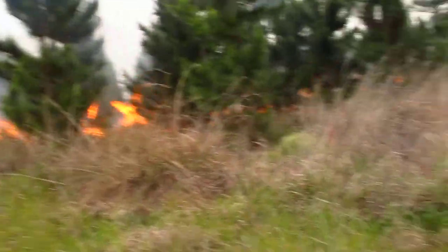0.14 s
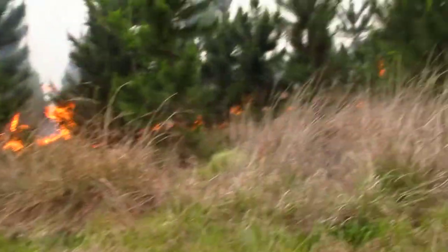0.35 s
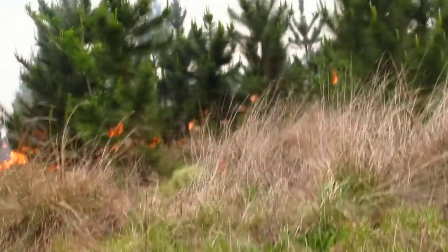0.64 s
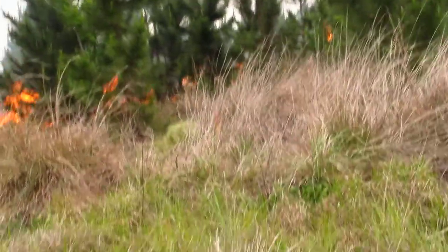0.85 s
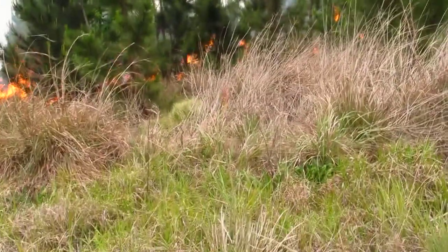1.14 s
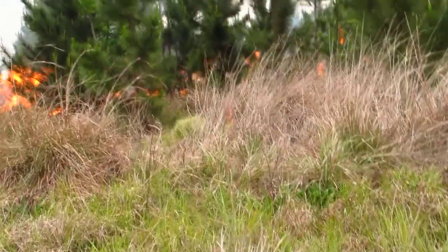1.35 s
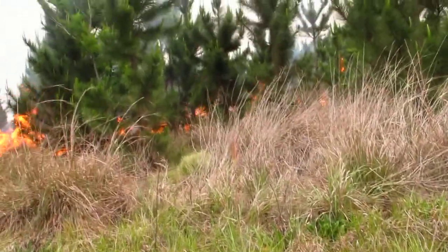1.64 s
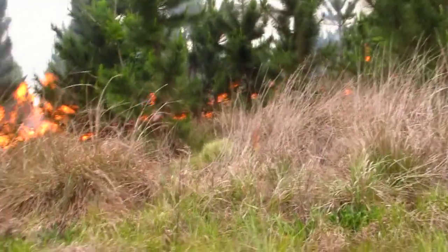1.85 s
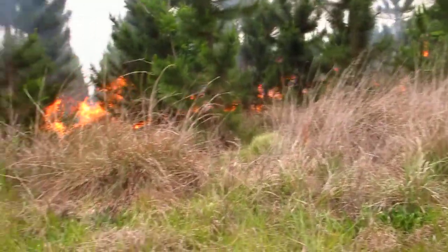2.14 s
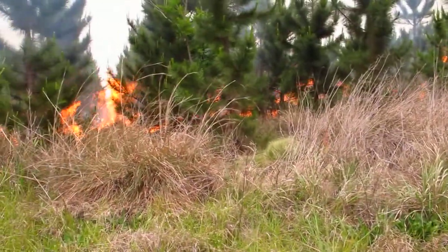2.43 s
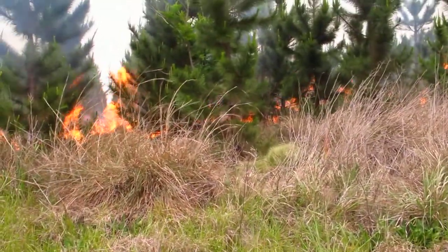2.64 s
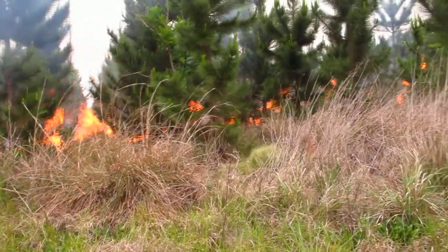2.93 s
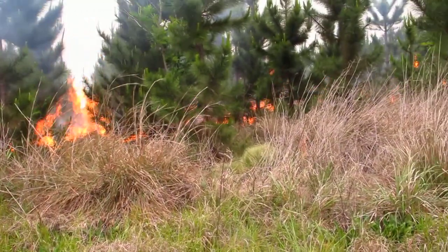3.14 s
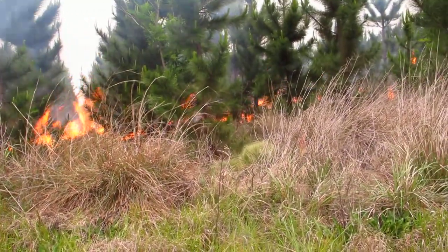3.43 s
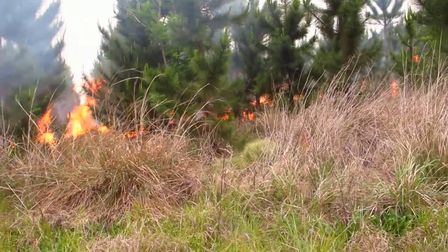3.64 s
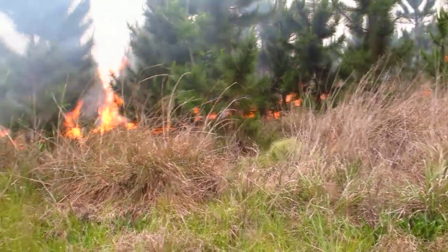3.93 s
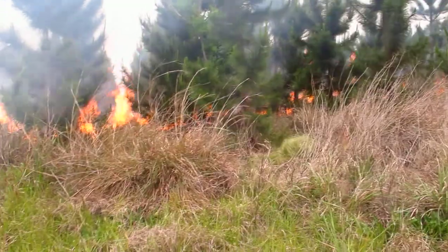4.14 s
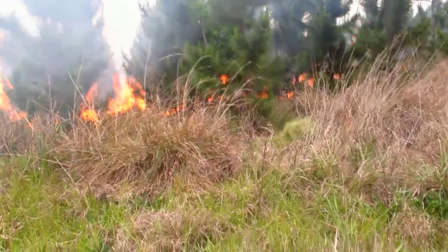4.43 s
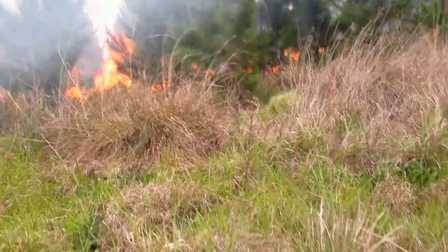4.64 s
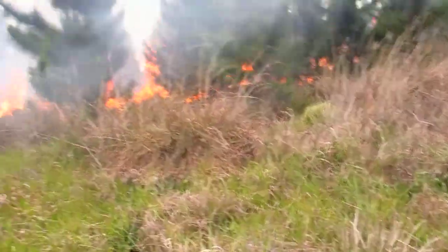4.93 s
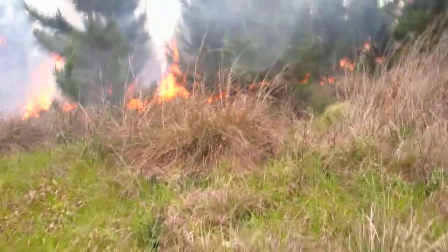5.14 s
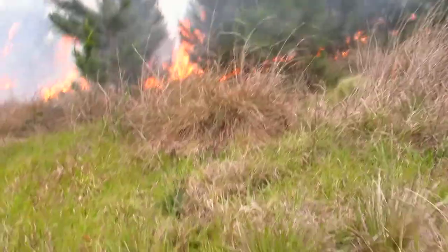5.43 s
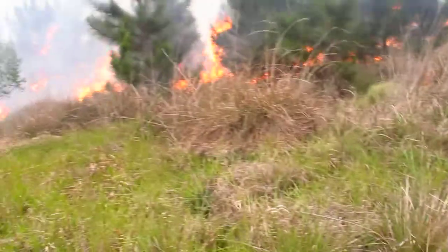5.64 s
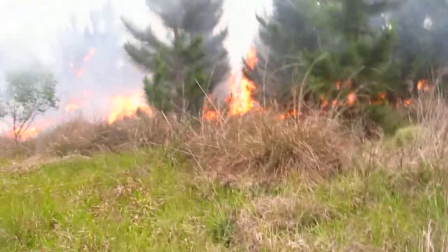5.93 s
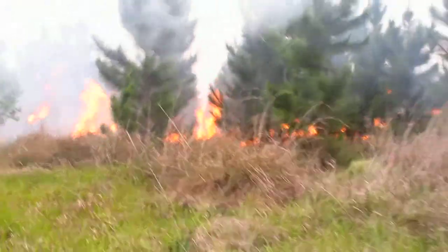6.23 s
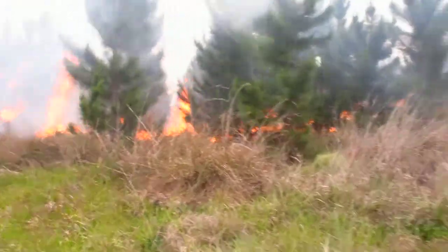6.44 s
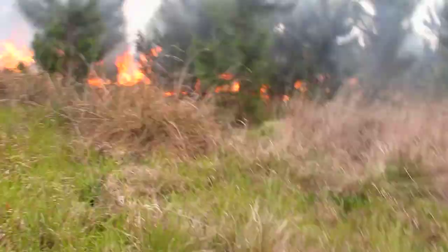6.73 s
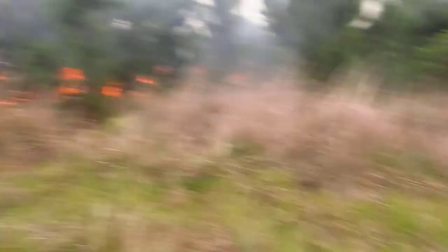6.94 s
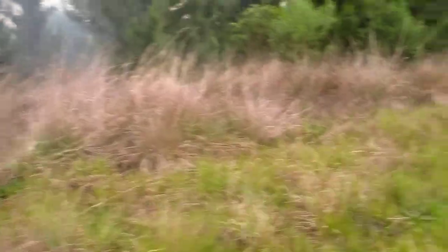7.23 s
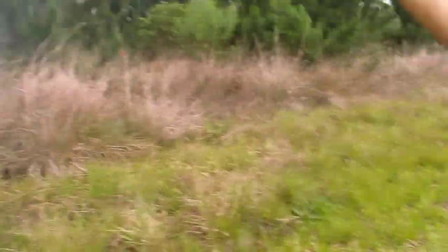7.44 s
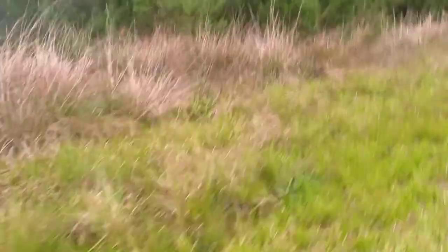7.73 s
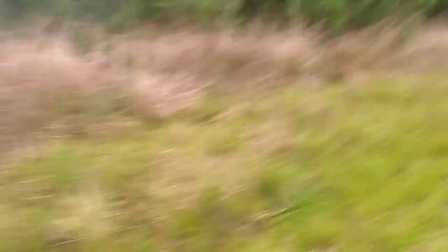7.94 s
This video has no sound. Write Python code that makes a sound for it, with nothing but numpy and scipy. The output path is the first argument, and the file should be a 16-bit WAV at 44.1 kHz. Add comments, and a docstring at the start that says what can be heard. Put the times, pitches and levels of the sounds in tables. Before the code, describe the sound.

Dry grass and young pine trees burn outdoors, some metres from a hand-held microphone. Dense crackling and a high hiss run throughout, swelling in brief flurries, while stems burst in sharp, irregular pops. The pops are loudest and thickest around the middle, then ease a little. The flames roar low underneath, wind buffets the microphone now and then, and grass rustles faintly near the start and end.

```python
"""Crackle, hiss and sharp pops: dry grass and young pines burn some metres from a hand-held camera.
Stems burst as pops that scatter through the grass; countless small ones merge into the crackle and hiss.
Under them the flames roar low, and a faint rustle comes and goes.
Wind buffets the two microphone ports, and each port rings at its own treble pitch;
gain control ducks the whole scene after the loudest pops."""
import sys
import numpy as np
from scipy import signal
from scipy.fft import rfft, irfft
from scipy.io import wavfile
from scipy.ndimage import uniform_filter1d, map_coordinates

SR = 44100
rng = np.random.default_rng(int(sys.argv[2]) if len(sys.argv) > 2 else 0)


def digitize_waveform(pressure):
    """Quantize a signal to 16-bit integers and store it at the path in sys.argv[1].

    Rows of a 2-D input are taken as channels; values are limited to [-1, 1].
    """
    field = np.atleast_2d(pressure).T
    bounded = np.clip(field, -1, 1)
    quanta = np.round(bounded * 32767).astype(np.int16)
    wavfile.write(sys.argv[1], SR, quanta)


N = 356416
BLOCK_SAMPLES = 256


def gain_of(db):
    """Decibels to an amplitude factor."""
    return 10 ** (np.asarray(db) / 20)


def unit_rms(x):
    """Scales to rms 1."""
    return x / np.sqrt(np.mean(x ** 2) + 1e-20)


def at_hz(table, hz):
    """Reads a spectrum table on a log-frequency axis."""
    table_hz, value = np.transpose(table)
    return np.interp(np.log(hz + 1), np.log(table_hz + 1), value)


def gain_curve(table, column):
    """One dB column of a time table as a gain per sample."""
    rows = np.array(table)
    return gain_of(np.interp(np.arange(N) / SR, rows[:, 0], rows[:, column]))


def add(mix, start_s, sound):
    """Mixes in a stereo sound."""
    part = mix[:, round(start_s * SR):][:, :sound.shape[1]]
    part += sound[:, :part.shape[1]]


def drift(span_s):
    """Smooth random curve of rms 1 that changes over span_s."""
    size = max(round(span_s * SR), 1)
    return unit_rms(uniform_filter1d(uniform_filter1d(rng.standard_normal(N), size), size))


# left-right coherence of wide sources: (frequency [Hz], coherence [0-1])
COHERENCE = [(60, 0.97), (150, 1), (380, 1), (950, 0.96), (2400, 0.89), (5000, 0.63), (15000, 0.13)]

def wide_noise(colour, patchy_db, coherence_scale=1):
    """Stereo noise with drifting spectral patches; the ports agree more in the bass."""
    frames, hz = N // 256 + 5, np.fft.rfftfreq(1024, 1 / SR)
    left_re, left_im, own_re, own_im, patches = rng.standard_normal((frames, 513, 5)).T
    patches = uniform_filter1d(patches, size=10, axis=0)
    patches = unit_rms(uniform_filter1d(patches, size=8, axis=1))
    coherence = np.clip(coherence_scale * at_hz(COHERENCE, hz), -1, 1)[:, None]
    left = left_re + 1j * left_im
    right = coherence * left + np.sqrt(1 - coherence ** 2) * (own_re + 1j * own_im)
    spectra = np.array([left, right]) * gain_of(at_hz(colour, hz)[:, None] + patchy_db * patches)
    return unit_rms(signal.istft(spectra, nperseg=1024, noverlap=768)[1][:, :N])


# bursting stem, with the ground-reflection dip: (frequency [Hz], level [dB])
STEM_SPECTRUM_DB = [(100, -41), (400, -10), (650, -7), (1000, -5.5), (1400, -12.5), (1800, -3),
                    (3000, -1.5), (5000, 0.5), (7000, 1), (9000, -3), (12000, -9.5), (16000, -27)]
BASS_HZ, TOP_HZ, TAPS = 2460, 6530, 2048

def stem_bursts(bass_db, top_db, pan_db, t60_s, scatter_db):
    """One click per stem, then sparse echoes off the grass; mono peak 1 through the ports."""
    t, hz = np.arange(TAPS) / SR, np.fft.rfftfreq(2 * TAPS, 1 / SR)
    noise = rng.standard_normal((len(t60_s), 4, TAPS))
    decay_db = 60 * t / np.clip(t60_s, .004, .06)[:, None, None]
    echoes = rfft(noise[:, :3] * gain_of(scatter_db - decay_db + 7 * noise[:, 3:]), 2 * TAPS)
    coherence = np.clip(at_hz(COHERENCE, hz), 0, 1)
    spectra = 1 + coherence * echoes[:, :1] + np.sqrt(1 - coherence ** 2) * echoes[:, 1:]
    bass, top = 1 / (1 + (hz / BASS_HZ) ** 4), 1 / (1 + (TOP_HZ / (hz + 1)) ** 6)
    colour_db = at_hz(STEM_SPECTRUM_DB, hz) + np.outer(bass_db, bass) + np.outer(top_db, top)
    cepstrum = irfft(np.log(gain_of(colour_db)))
    cepstrum[:, 1:TAPS] *= 2  # fold to minimum phase
    cepstrum[:, TAPS + 1:] = 0
    spectra *= np.exp(rfft(cepstrum))[:, None]
    lag_samples = (2.2 + 0.42 * noise[:, 0, 0])[:, None] * [-.5, .5] + 8  # direction of arrival
    spectra *= np.exp(-2j * np.pi * lag_samples[..., None] * hz / SR)
    spectra *= gain_of(np.outer(pan_db, [.5, -.5])[..., None] * (1 - bass))  # camera shades treble only
    clicks = irfft(spectra)[..., :TAPS]
    return clicks / abs(port_cavities(clicks).mean(axis=1)).max(axis=1)[:, None, None]


def crackle(rate_per_s, spread_db, cap_db, kinds):
    """Small stems burst in clumps: many tiny, few larger."""
    bass, top, pan, decay = rng.standard_normal((kinds, 4)).T
    clicks = stem_bursts(4.8 * bass, 3.1 * top, 2.4 * pan, 0.012 * gain_of(4 * decay), scatter_db=-23.5)
    fires = rng.random(N) < rate_per_s * gain_of(3 * drift(.012)) / SR
    sizes = fires * gain_of(np.minimum(spread_db * rng.exponential(1, N), cap_db))
    kind = rng.integers(0, kinds, N)
    trains = (signal.oaconvolve((sizes * (kind == k))[None], clicks[k], axes=1) for k in range(kinds))
    return unit_rms(sum(trains)[:, :N])


# far fire: (frequency [Hz], level [dB])
HISS_SPECTRUM_DB = [(300, -11.5), (1000, -14), (1400, -15), (2000, -7), (5000, -2), (7000, -1.5),
                    (9000, -7), (12000, -10), (16000, -28)]

def hiss():
    """Countless far bursts merge into noise."""
    return wide_noise(HISS_SPECTRUM_DB, patchy_db=3.3)


# crackle flurries: (centre [s], rise [dB], length [s])
FLURRY_RISES_DB = [(0.28, 4, 0.084), (0.779, 5, 0.022), (.874, 6.5, 0.067), (1.205, 5.5, 0.074),
                   (1.285, 4.5, .04), (1.435, 8, 0.032), (1.98, 1, 0.27), (2.312, 3.5, 0.078),
                   (2.471, 7.5, 0.028), (2.788, 8, 0.036), (3.144, 5.5, 0.037), (3.318, 6, 0.21),
                   (3.662, 6, 0.021), (4.055, 6.5, 0.067), (4.613, 4, 0.2), (4.715, 8.5, 0.02),
                   (4.844, 6, 0.091), (5.15, 1, 0.04), (5.463, 5, 0.052), (5.602, 5, .055),
                   (5.733, 2.5, 0.042), (6.633, 7, 0.082), (6.802, 6, 0.079), (7.076, 7, 0.025),
                   (7.207, 5, .029), (7.36, 6.5, 0.025), (7.613, 4, 0.04), (7.982, 3.5, 0.046)]

def flurry_gain():
    """Brief swells, as when a tuft catches."""
    t = np.arange(0, N, BLOCK_SAMPLES) / SR
    swell_db = sum(rise_db * np.exp(-(2 * (t - centre_s) / max(length_s, .01)) ** 2)
                   for centre_s, rise_db, length_s in FLURRY_RISES_DB)
    return gain_of(np.interp(np.arange(N) / SR, t, swell_db))


# fire and wind strength: (time [s], crackle and hiss [dB], wind [dB], flame roar [dB])
LEVELS_DB = [(0, -35.5, -43.5, -50), (.3, -35.5, -62, -46), (.6, -37, -59, -46.5), (1.05, -38, -56, -50.5),
             (1.35, -37, -61, -47.5), (1.7, -33, -59, -45.5), (2.05, -32.5, -45, -45.5),
             (2.6, -34, -54, -43), (3.05, -32, -47, -47), (3.3, -37.5, -47, -43.5),
             (3.65, -31.5, -51.5, -43), (3.9, -34, -41, -41.5), (4.2, -27, -50, -42),
             (4.75, -33.5, -50, -41.5), (5.1, -33, -36, -45), (5.35, -35.5, -48, -47.5),
             (5.85, -35.5, -43.5, -46.5), (6.3, -33.5, -49, -47), (6.5, -35, -44, -46),
             (6.9, -35, -54, -46), (7.4, -35, -54, -49), (8.08, -34, -55, -46)]

def small_stems():
    """Crackle and hiss rise and sink together with the burn."""
    small_bursts = crackle(rate_per_s=800, spread_db=5.5, cap_db=18.8, kinds=24)
    bed = gain_of(-4.5) * small_bursts + gain_of(-9) * hiss()
    return bed * gain_curve(LEVELS_DB, column=1) * flurry_gain()


# flames: (frequency [Hz], level [dB])
ROAR_SPECTRUM_DB = [(30, -18), (90, 9), (200, 2), (600, 1), (1100, -6), (1500, -11), (3000, -17.5)]

def flame_roar():
    """Low, uneven noise of the flames."""
    return gain_curve(LEVELS_DB, column=3) * wide_noise(ROAR_SPECTRUM_DB, patchy_db=2.1)


# rustle strength: (time [s], level [dB])
RUSTLE_LEVEL_DB = [(0, -57), (.22, -59), (.3, -39.5), (.36, -52), (.62, -45), (.75, -69), (6.9, -54.5),
                   (7.15, -51), (7.8, -49.5), (8.08, -58)]
# rustle colour: (frequency [Hz], level [dB])
RUSTLE_SPECTRUM_DB = [(400, -7), (700, -3), (1500, -0.5), (2200, -13), (5000, -60)]

def rustle():
    """Flickering midrange noise, like grass brushed near the camera."""
    noise = wide_noise(RUSTLE_SPECTRUM_DB, patchy_db=3.2)
    return gain_curve(RUSTLE_LEVEL_DB, column=1) * noise * gain_of(3.9 * drift(0.014))


# wind at the ports: (frequency [Hz], level [dB])
WIND_SPECTRUM_DB = [(15, -9), (45, 3.5), (100, -6.5), (200, -7.5), (400, -23.5), (1000, -49)]

def wind_rumble():
    """Lumpy pressure, nearly unrelated at the two ports."""
    rumble = wide_noise(WIND_SPECTRUM_DB, patchy_db=1.8, coherence_scale=.35)
    gusts_db = 2.5 * np.array([drift(0.07), drift(0.031)])
    return gain_curve(LEVELS_DB, column=2) * rumble * gain_of(gusts_db)


# loud stem bursts: (time [s], level [dB], bass boost [dB], top boost [dB], left-right [dB])
STEM_POPS = [(0.0115, -6.5, -3, 6, 1), (0.037, -12.5, 5.5, 5, 4), (0.0964, -16, 8, 0, 6),
             (0.0977, -11.5, 4, 9, 1), (0.1358, -9.5, 12, 1, 2), (.165, -16, 1, -7, 3),
             (.2286, -9, -7, 6, -1), (0.2996, -16, 5, 5, -9), (0.3176, -8, 0, 5, 0),
             (0.412, -25, 24, -5, -3), (0.445, -9, -6, -2, -1), (.462, -17.5, 11.5, -2, 0),
             (0.5066, -15, 13, 8, 4), (0.5457, -26, 30, -1, 4), (.5599, -3, -31, -12, 2),
             (.6206, -14, -4, -11, -1), (.6611, -9, -1, -16, -2), (0.68, -18, 19, 6, 2),
             (.7737, -5, -31, -15, -1), (0.788, -15, 2, -1, 0), (0.827, -15, 0, 12, 3),
             (0.849, 1, -0.5, -14.5, -1.5), (0.8705, -7.5, 6, 1, -1), (.914, -12.5, -3, -9, 0),
             (0.9919, -7, 7.5, -9, 0), (1.054, -14, -18, -8, -3), (1.121, -11.5, -2, 1, 4),
             (1.2102, -12.5, -3, -12, -3), (1.306, -17.5, -5, 4, -5), (1.4218, -20, 9, -11, -8),
             (1.6492, -15, 0, 7, 1), (1.7062, -18, -7, -14, -6), (1.77, -11.5, -6.5, -21, -8),
             (1.799, -9.5, -8, -8, -1), (1.898, -15, -6, 0, 12), (1.9833, -5, 2, -5, -2),
             (2.0063, -4, 12, 0, -1), (2.0444, -15.5, 9, -1, -5), (2.2782, -6.5, 6, 3, -2),
             (2.2985, -11, 12, 9, 2), (2.4085, -5, 2, -2, 6), (2.436, -17, -13, 0, 17),
             (2.4498, -7, 3, -31, -1), (2.5391, -13, -3, 0, -4), (2.5753, -10.5, -11, 0, 1),
             (2.7039, -10, 7.5, 2, 2), (2.777, -5, -5, -17, -5), (2.7895, -8, -3, -13, -1),
             (2.867, -5.5, 1, 1, -1), (2.9172, -11, -27, -5, 5), (2.9774, -9, -10, 7, 1),
             (2.9951, -9.5, -4, 22, 4), (3.0141, -11, 10, 6, 4), (3.0913, -9, -17, 2, 1),
             (3.1077, -9.5, -4, -13, -1), (3.1738, -14, 1, 9, 6), (3.1869, -15, -25, 17, 1),
             (3.207, -17.5, 21.5, 6, 1), (3.2153, -6, 3, 3, 2), (3.3185, -8.5, 11.5, 4, 2),
             (3.352, -12, -7, 4, -9), (3.3717, -13.5, 20.5, 16, 4), (3.4134, -8, 1, -5, -7),
             (3.545, -7.5, 10, 5, 2), (3.604, -13.5, 14, 7, 9), (3.6493, -11.5, -1, -2, -1),
             (3.668, -13.5, 11, -1, -3), (3.6888, -2.5, -36, 7, 1), (3.7007, -18, -15, 20, 1),
             (3.7129, 2, 2, -3, -2), (3.7204, -1.5, 3, 1.5, 0), (3.8427, -1, -9, -2, 0),
             (3.8631, -6, -11, 4, 1), (3.9137, -8.5, 24, -2, -9), (3.9163, -4, -4, 1, 3),
             (3.93, -11, 2, -8, 0), (3.9439, -5.5, -4, -2, 3), (3.9801, -3, 1, -1, -2),
             (4.0024, -0.5, 5, 4, 1), (4.0234, 0.5, 7, 17, 6), (4.034, 3, 1, 1, -6),
             (4.0552, -3.5, 9, 5, -5), (4.0646, 5, -17, -2, 0), (4.1135, -7, 11.5, -1, 0),
             (4.1253, 9, -8, 5, -0.5), (4.1374, 2, 2, 2, -3), (4.2, 4, -23, 10, -1), (4.2524, -1, 0, 1, -3),
             (4.335, 1, 3, 7, 2), (4.4062, -9.5, -14, -5, 2), (4.4723, -4.5, -4, -28.5, -4),
             (4.517, 0, -9, -28, -7), (4.574, -1.5, -2, 0, -2), (4.6011, -4, 14.5, 8, -2),
             (4.6156, 0, -1, -7, -1), (4.588, -6.5, -1, 4.5, -1), (4.6434, -6, 4.5, -11, -7),
             (4.7128, -16, 10, -7.5, -3), (4.733, -9, 1, -14, -1), (4.7588, -6.5, -4, 8, -1),
             (4.7878, -5.5, -15, -12, -1), (4.8248, -6.5, -3, -3, 7), (4.8772, -16.5, 26, 1, -6),
             (5.0451, -12, -5, 10, -5), (4.9836, -9.5, -7, 5, -2), (5.1495, -11, -2, 10, 5),
             (5.1966, -22.5, 14, -2, -5), (5.24, -5.5, -33, -18, -5), (5.2651, -8, -18, 0, 2),
             (5.358, -19, 4, -4, -1), (5.4388, -6, 6.5, 11, -2), (5.5162, -16, -11, 7, -5),
             (5.616, -12, -15, 2, 13), (5.6912, -13.5, 11.5, 1, -5), (5.7066, -15.5, 16, 5, 1),
             (5.7312, -10.5, -18, -7, -4), (5.7541, -7, -3, 6, 10), (5.9417, -6.5, -12, 3, -5),
             (6.0984, -16, -12, -19, -2), (6.177, -18, 3, 2, -1), (6.2139, -3.5, -16, 15, 2),
             (6.2498, -2, -7, -13, -3), (6.27, -6, -10, -13, -4), (6.3, -15, -8, 8, 0),
             (6.3804, -13, -9, -12, 3), (6.425, -14, -13, -4, 2), (6.6294, -12, -5, 14, 5),
             (6.657, -9, 8, 13, -1), (6.6776, -1, 3.5, 0, -0.5), (6.7657, -7, -2, -9, 0),
             (6.8125, -9, 2, -3, -2), (7.0152, -14, 10.5, -3, -4), (7.056, -5.5, 0, 1, -6),
             (7.1437, -13, 10, 8, -6), (7.158, -12, -13, 3, 5), (7.198, -7, -10, 5, 1),
             (7.2294, -10.5, 2, 10, 3), (7.245, -16, -5, -9, -1), (7.3398, -7, -14, -11, -3.5),
             (7.37, -21, 16, 8, 3), (7.426, -12.5, 3, 2, 1), (7.438, -12, -3, 0, -3),
             (7.4446, -16.5, 22, 1, 2), (7.4868, -9, -2, 4, 2), (7.512, -9.5, -3, -1, -6),
             (7.583, -1.5, -10.5, -8, -2.5), (7.6723, -10, -24, -4, -3), (7.7254, -18.5, 24.5, 12, 0),
             (7.9141, -22, 28, 2, 3), (7.9556, -7, -4, -5, -3)]
BASE_T60_S, T60_SPREAD_DB = .010, 2.5

def pops():
    """Single stems burst; bassy ones scatter longer, loud ones shorter."""
    times_s, level_db, bass_db, top_db, pan_db = np.transpose(STEM_POPS)
    stretch_db = 0.16 * bass_db - 0.4 * level_db + T60_SPREAD_DB * rng.standard_normal(len(times_s))
    clicks = stem_bursts(bass_db, top_db, pan_db, BASE_T60_S * gain_of(stretch_db), scatter_db=-21)
    out = np.zeros((2, N))
    for time_s, gain, click in zip(times_s, gain_of(level_db), clicks):
        add(out, time_s - .0004, gain * click)
    return out


# wind buffets: (time [s], level [dB], pitch [Hz], left-right [dB])
WIND_BUFFETS = [(1.995, -27.5, 155.4, -12), (2.018, -22.5, 142.4, -16), (2.196, -34.5, 116, 27),
                (2.512, -22.5, 219, -17), (2.977, -29.5, 147.7, 22), (3.008, -25.5, 200.7, 14),
                (3.201, -30, 124, -8), (3.878, -26, 157.6, -20), (3.904, -16.5, 218, -25),
                (4.941, -24.5, 204, 16), (5.059, -43, 111, -23.5), (5.059, -26, 205.5, 29),
                (5.087, -27, 104.3, -17), (5.089, -20, 242, 36), (5.105, -26, 110.6, -24),
                (5.132, -27, 142.5, -18), (5.16, -28, 185, -20), (5.185, -34, 121, 18),
                (5.56, -24.5, 132.8, -24), (5.789, -30, 200, 18), (5.79, -35, 142.4, -18),
                (5.824, -19, 209, 31), (5.835, -24, 140.7, -18), (5.87, -17.5, 198, 34),
                (6.016, -29, 125.8, -16), (7.039, -28.5, 128, 26)]

def wind_buffets():
    """Short pressure pushes wrapped in eddies, each mostly on one port."""
    out = np.zeros((2, N))
    for time_s, level_db, hz, pan_db in WIND_BUFFETS:
        cycles = np.arange(-4, 4, hz / SR)
        push = np.sin(2 * np.pi * (cycles + rng.random())) * np.exp(-(cycles / 0.65) ** 2)
        band = signal.butter(1, [.5 * hz, 1.5 * hz], "band", fs=SR)
        eddies = unit_rms(signal.lfilter(*band, rng.standard_normal(len(cycles))))
        puff = push + 0.2 * eddies * np.exp(-(cycles / 2.8) ** 2)
        add(out, time_s - 4 / hz, puff * gain_of(level_db + np.minimum([[pan_db], [-pan_db]], 0)))
    return out


# camera heading: (time [s], left-port lag [samples], crackle and hiss treble [dB])
CAMERA_HEADING = [(0, 0.5, -1.5), (1.5, -0.3, -4), (3.2, 0.24, -1), (4.7, 1, 1.5), (5.7, 1.5, -1),
                  (6.7, 1, -1.5), (7.2, -0.9, -2), (8.08, -1.5, -5)]

def camera_turn(x, db_per_lag_sample):
    """Turning shifts the left port in time and level."""
    samples = np.arange(N)
    lag_samples = np.interp(samples / SR, *np.transpose(CAMERA_HEADING)[:2])
    left = map_coordinates(x[0], [samples - lag_samples], order=3, mode="nearest")
    return np.array([gain_of(db_per_lag_sample * lag_samples) * left, x[1]])


def camera_shade(x, corner_hz=3520):
    """The camera body dims the treble of a fire off to the side."""
    low = signal.lfilter(*signal.butter(1, corner_hz, fs=SR), x)
    return low + gain_curve(CAMERA_HEADING, column=2) * (x - low)


# left and right port cavity: (resonance [Hz], bandwidth [Hz], gain [dB])
PORT_RESONANCES = [(4800, 900, -1.5), (7200, 2200, 0)]

def port_cavities(x):
    """Each port is a small cavity: flat below its ring, falling above."""
    out = []
    for side, (hz, width_hz, gain_db) in zip(np.moveaxis(x, -2, 0), PORT_RESONANCES):
        radius = np.exp(-np.pi * width_hz / SR)
        poles = [1, -2 * radius * np.cos(2 * np.pi * hz / SR), radius ** 2]
        out.append(signal.lfilter([gain_of(gain_db) * sum(poles)], poles, side))
    return np.stack(out, axis=-2)


def gain_control(x, limit_db=-6.5, cut_share=0.48, recover_db_per_s=12.5, react_s=0.0068):
    """Every peak over the limit turns the gain down, and it creeps back."""
    peaks = np.maximum.reduceat(abs(x.mean(axis=0)), np.arange(0, N, BLOCK_SAMPLES))
    cut_db, cuts_db = 0., []
    for peak_db in 20 * np.log10(peaks + 1e-9):
        cuts_db.append(cut_db)
        cut_db += cut_share * max(peak_db - cut_db - limit_db, 0)
        cut_db = max(cut_db - recover_db_per_s * BLOCK_SAMPLES / SR, 0)
    pole = np.exp(-1 / (react_s * SR))
    smooth_cut_db = signal.lfilter([1 - pole], [1, -pole], np.repeat(cuts_db, BLOCK_SAMPLES)[:N])
    return x / gain_of(smooth_cut_db)


def scene():
    """Crackle, hiss, roar, rustle and wind, with pops and buffets on top."""
    bed = camera_turn(camera_shade(small_stems()), db_per_lag_sample=0.93) + flame_roar() + rustle()
    loud_stems = camera_turn(pops(), db_per_lag_sample=1.5)
    return bed + loud_stems + wind_rumble() + wind_buffets()


def record(dry):
    """Port cavities, gain control, clipping near full scale, band limit."""
    clipped = np.clip(gain_control(port_cavities(dry)), -.96, .96)
    lowpass = signal.firwin(201, cutoff=16050, window=("kaiser", 9), fs=SR)
    return signal.oaconvolve(clipped, lowpass[None], "same")


dry = scene()
out = record(dry)
digitize_waveform(out)
```